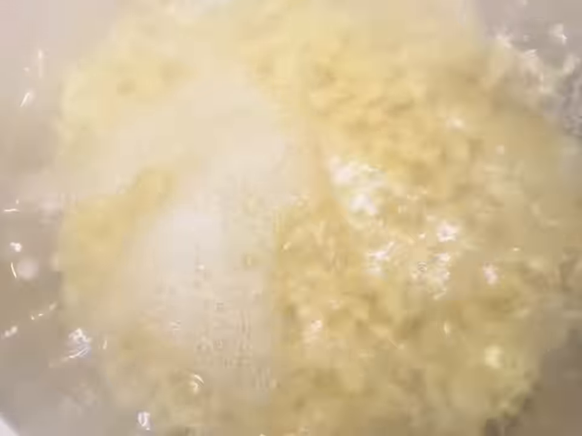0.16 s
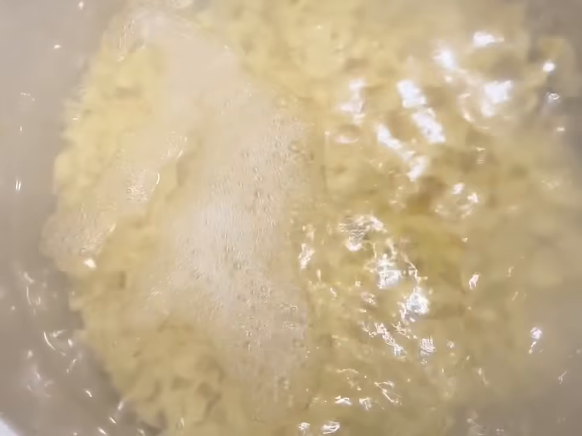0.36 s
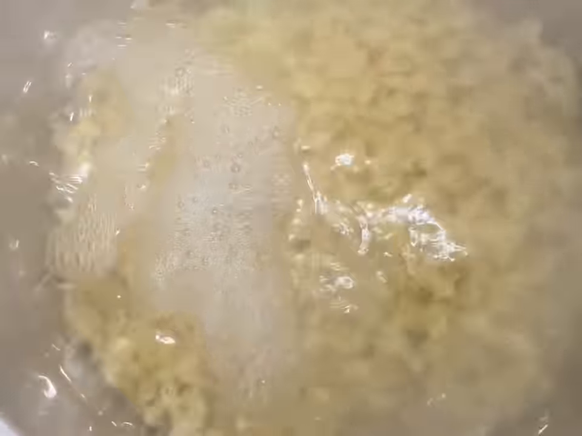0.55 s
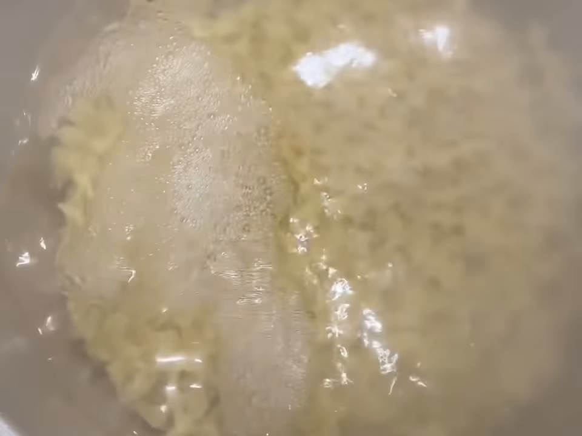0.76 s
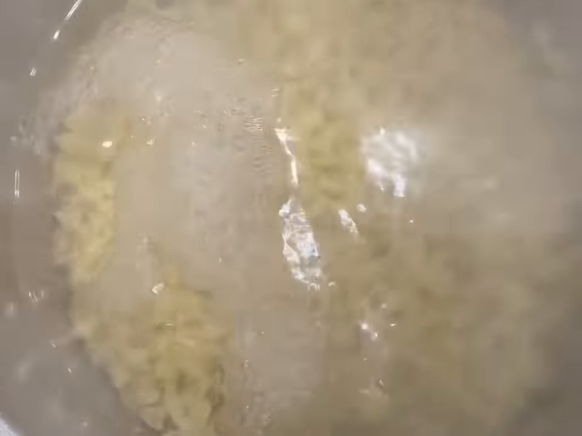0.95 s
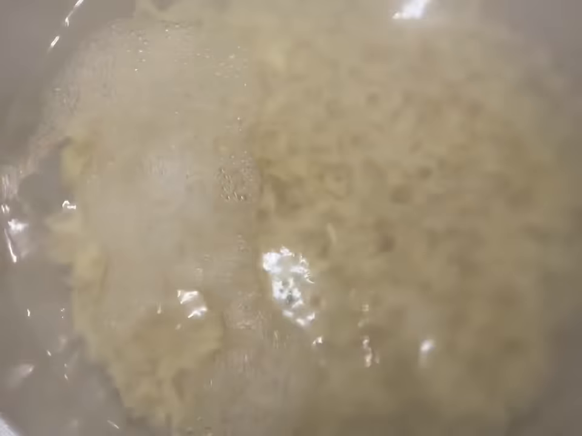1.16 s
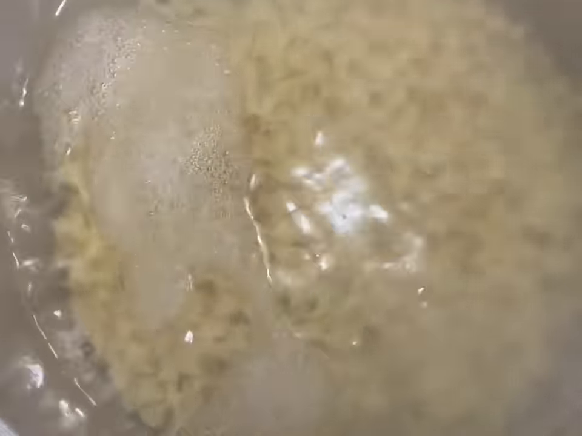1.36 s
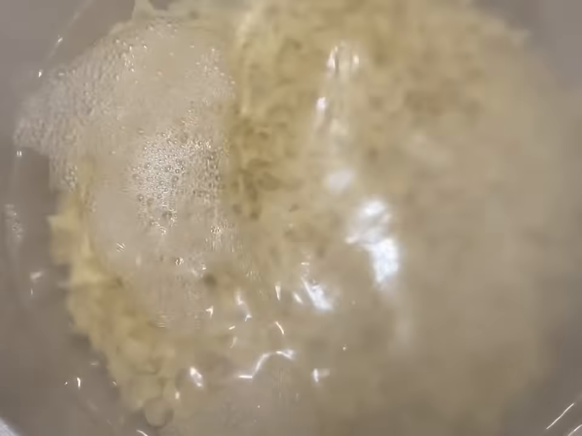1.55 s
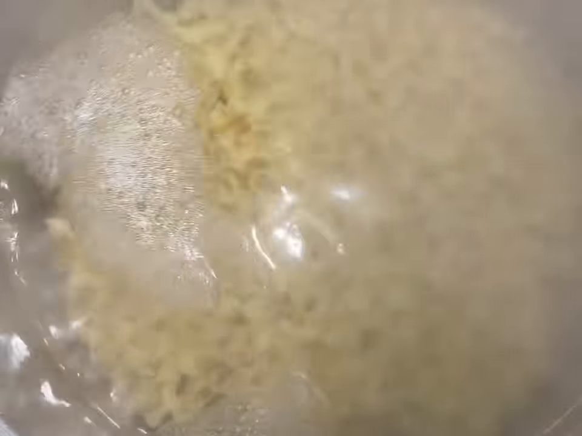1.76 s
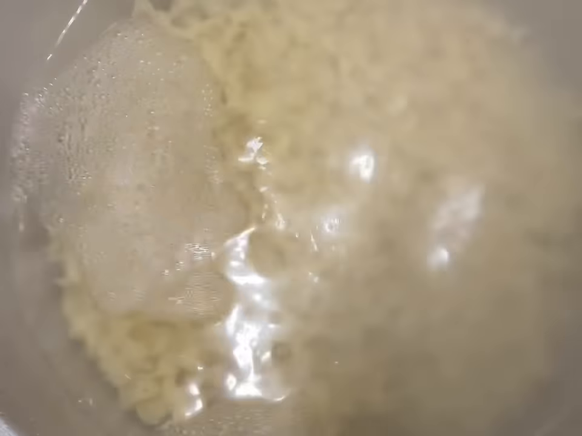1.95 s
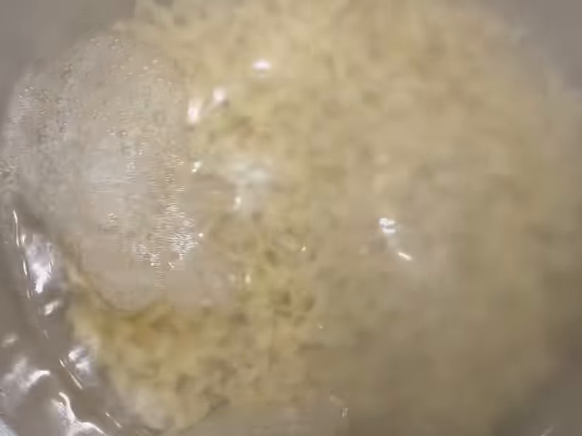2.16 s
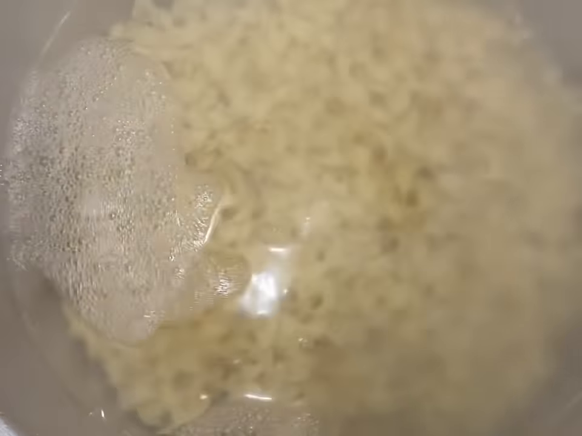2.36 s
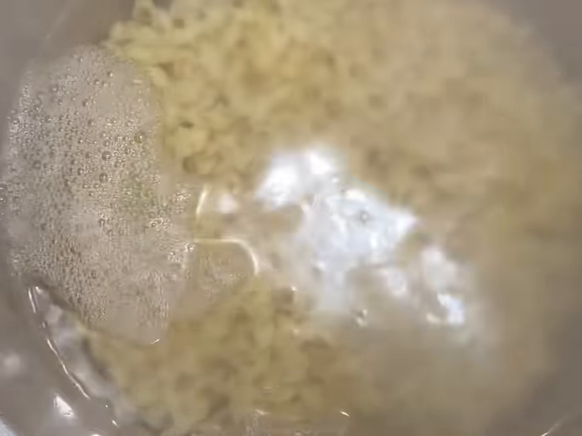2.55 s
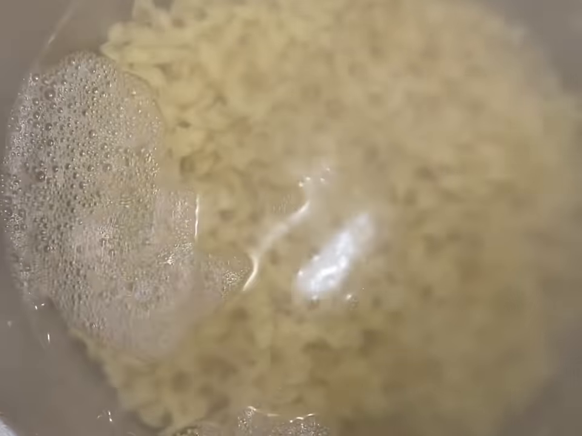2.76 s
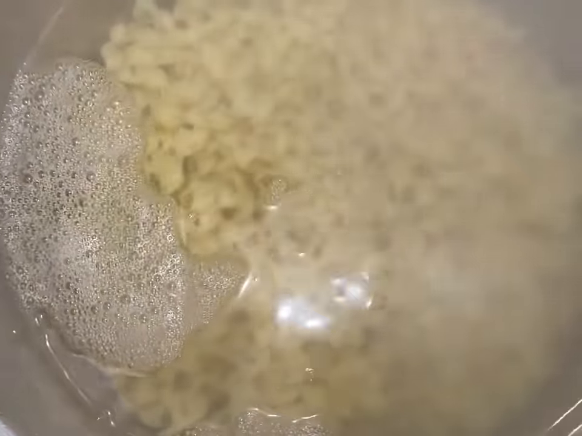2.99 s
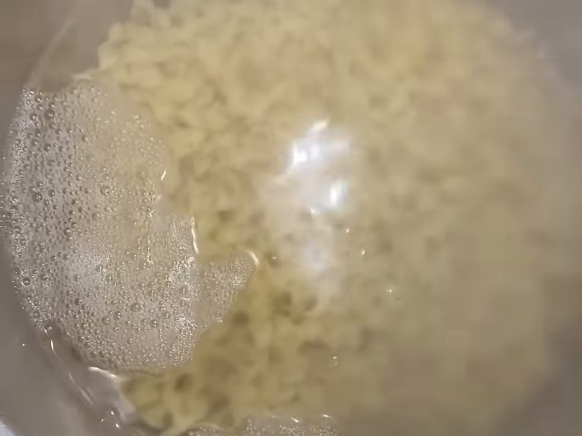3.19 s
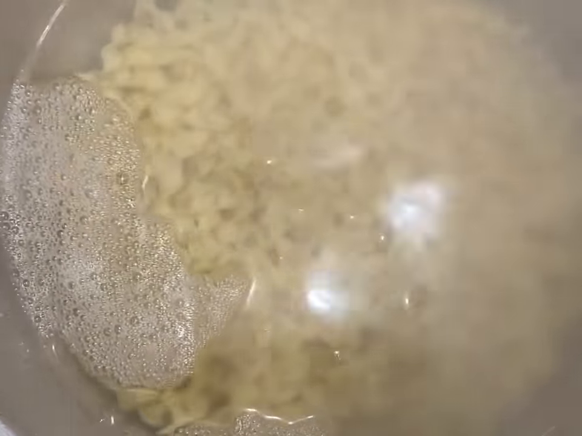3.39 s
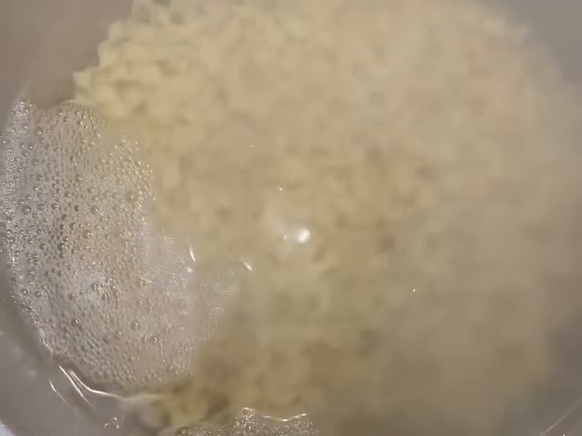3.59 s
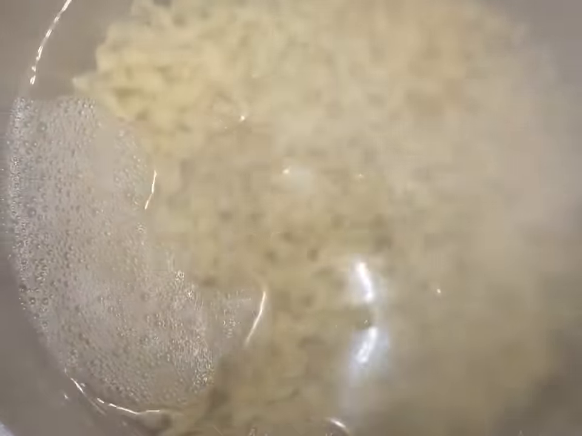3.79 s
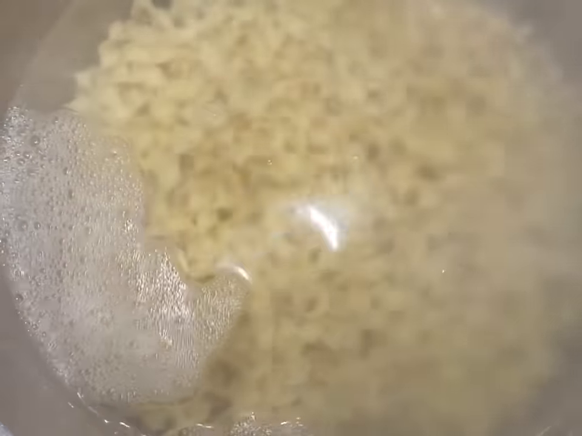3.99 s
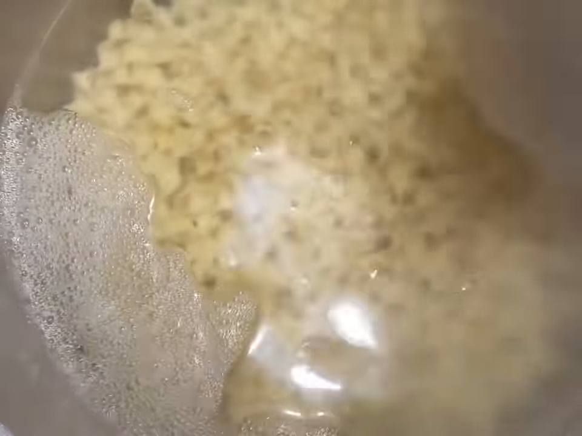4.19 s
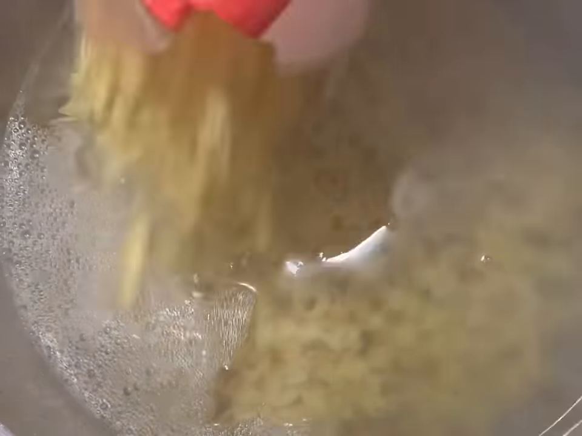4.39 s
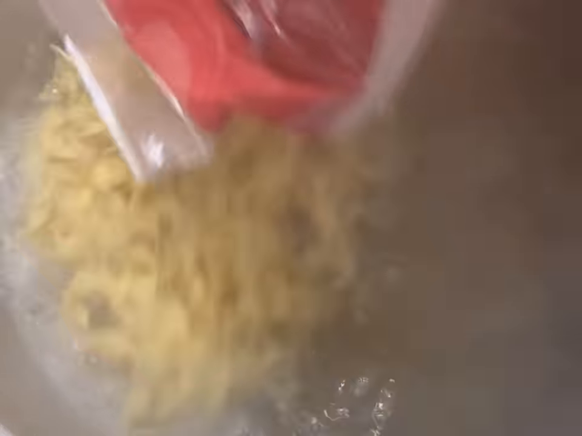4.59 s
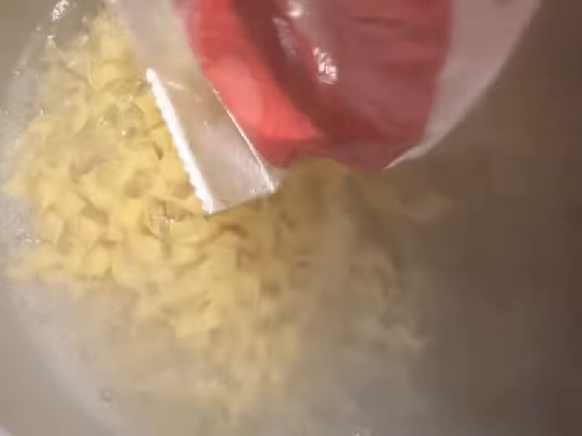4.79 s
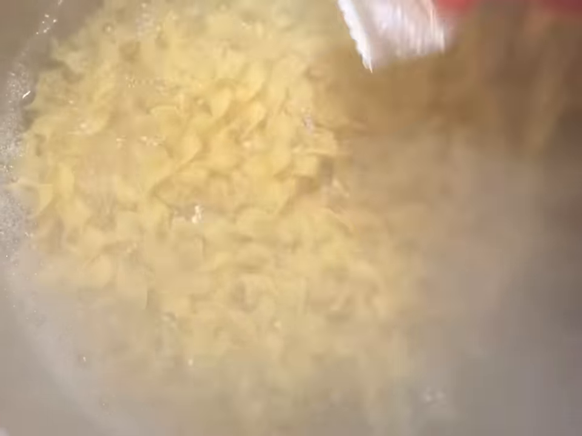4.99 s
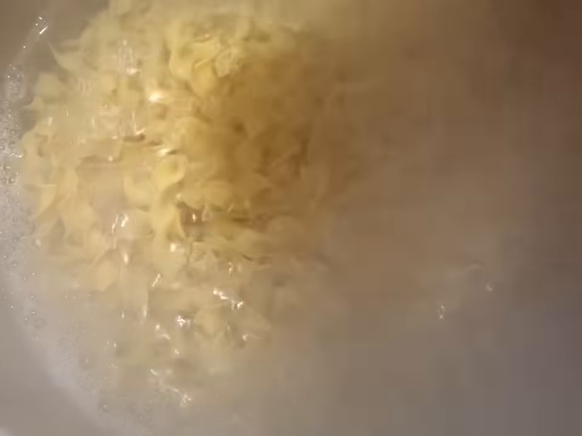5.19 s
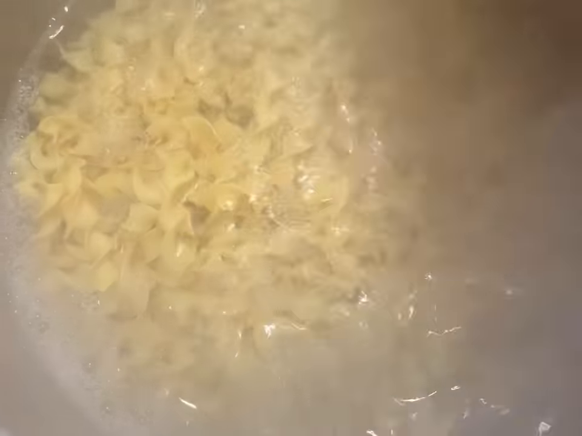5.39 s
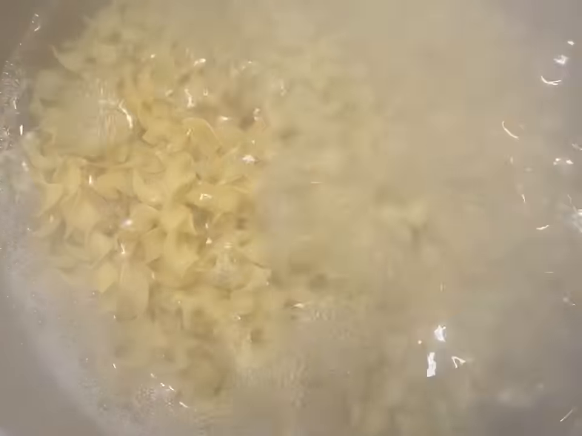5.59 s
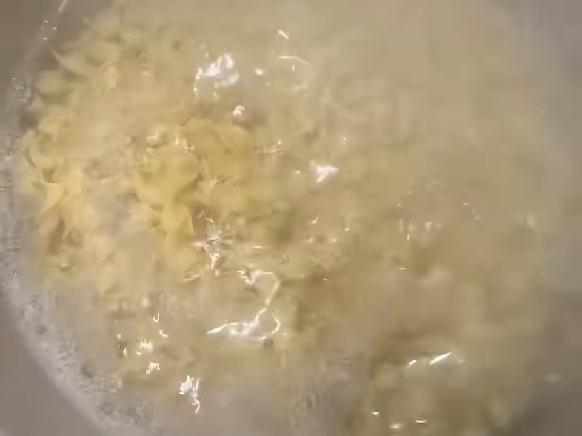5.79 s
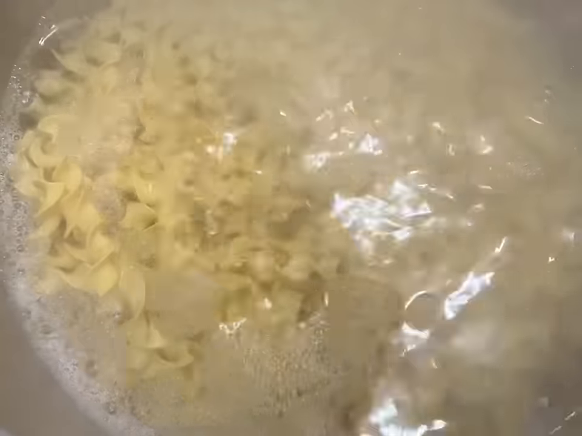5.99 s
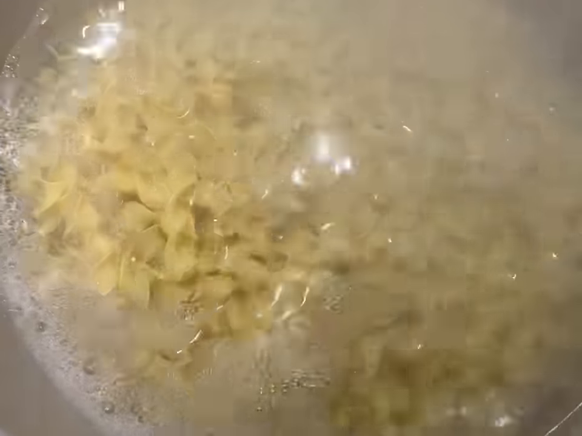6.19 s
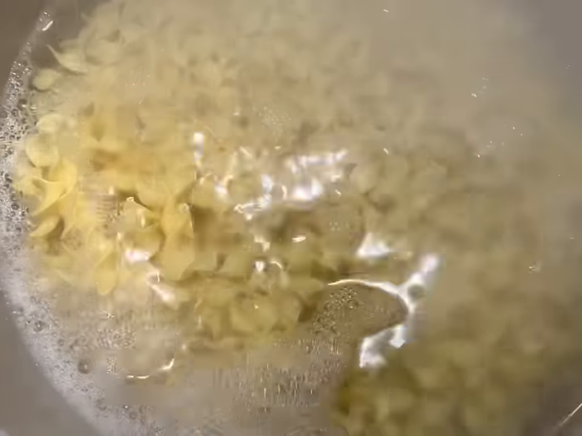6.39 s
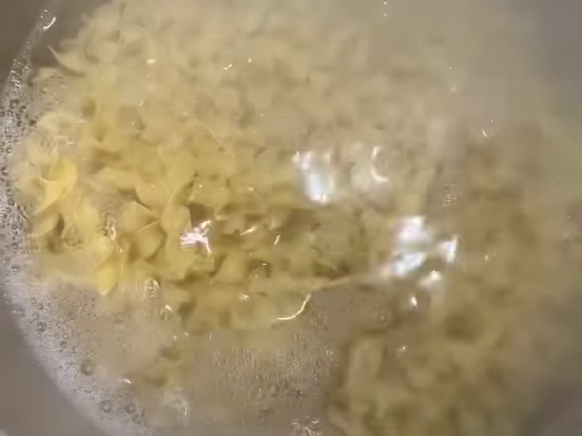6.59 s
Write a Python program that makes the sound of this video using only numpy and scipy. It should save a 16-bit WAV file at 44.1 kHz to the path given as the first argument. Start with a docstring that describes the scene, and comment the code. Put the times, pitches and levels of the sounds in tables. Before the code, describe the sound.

Close by a softly bubbling pot, film snaps and noodles shift in a bag, then rattle out and plunge into the water before lighter crinkles.

```python
"""Dry noodles into a simmering pot

At a kitchen stove, close to a stereo camera, bubbles tick and blip over a soft noise rush; three tones hum,
wavering slightly. A plastic bag of dry noodles is handled: the film snaps as short clicks and flutters of
noise, and the noodles shift in surges of random contacts. The bag is tipped: noodles rattle out as contacts and
short damped tones, its mouth flaps as a ringing tone, and clumps plunge as low pulses over a churn. The bag
crinkles on. Early, one soft bump of the camera and its after-ring sound as low tones. Pot modes and a short
kitchen tail colour the nearby sounds."""
import sys
import numpy as np
from scipy import signal
from scipy.fft import rfft, irfft, next_fast_len
from scipy.io import wavfile
from scipy.ndimage import map_coordinates

SR = 44100
rng = np.random.default_rng(int(sys.argv[2]) if len(sys.argv) > 2 else 0)


def inscribe(sig):
    """Save sig as 16-bit PCM at rate SR to the path in sys.argv[1].

    A 1-D sig is mono; a 2-D sig holds one channel per row.
    Samples are clipped to [-1, 1] before scaling.
    """
    pcm = np.round(np.clip(np.atleast_2d(sig).T, -1, 1) * 32767)
    wavfile.write(sys.argv[1], SR, pcm.astype(np.int16))


N = 293265  # length in samples


def amp(db):
    """Decibels to gain."""
    return 10 ** (np.asarray(db) / 20)


def unit(x):
    """Scaled to rms 1."""
    return x / np.sqrt(np.mean(x ** 2) + 1e-20)


def along(points, hz):
    """(Hz, value) points read on a log frequency axis."""
    f, v = np.transpose(points)
    return np.interp(np.log(hz + 1), np.log(f + 1), v)


def wobble(rate):
    """A smooth random curve, rate knots a second."""
    knots = rng.standard_normal(int(N * rate / SR) + 4)
    return map_coordinates(knots, [np.arange(N) * rate / SR])


def filtered(x, response):
    """x times a complex response of frequency."""
    m = next_fast_len(N + SR // 2)
    spectrum = rfft(x, m) * response(np.fft.rfftfreq(m, 1 / SR))
    return irfft(spectrum, m)[..., :N]


def convolved(x, response):
    """x through an impulse response of one or two channels."""
    return signal.fftconvolve(np.atleast_2d(x), response, axes=1)[:, :N]


def coloured(x, spectrum, size=2048):
    """Causal (minimum-phase) colour of unit energy, so that clicks keep their sharp front."""
    cepstrum = irfft(np.log(amp(along(spectrum, np.fft.rfftfreq(size, 1 / SR)))))
    cepstrum[1:size // 2] *= 2  # fold the cepstrum onto its causal half
    cepstrum[size // 2 + 1:] = 0
    response = irfft(np.exp(rfft(cepstrum)))
    return convolved(x, response[None] / np.linalg.norm(response))


def split(x, hz, order=3):
    """The parts below and above a frequency."""
    return [signal.sosfilt(signal.butter(order, hz, kind, fs=SR, output="sos"), x) for kind in ("low", "high")]


def tick(t60, alike, attack=.0001):
    """One dry contact: decaying noise of energy 1, shared between the two channels by the part alike."""
    t = np.arange(SR // 24) / SR
    shared, own = rng.standard_normal(len(t)), rng.standard_normal((2, len(t)))
    share = np.clip(alike, 0, 1)
    noise = np.sqrt(share) * shared + np.sqrt(1 - share) * own
    envelope = amp(-60 * t / t60) * (1 - np.exp(-t / attack))
    return unit(noise * envelope) / np.sqrt(len(t))


def scatter(rate, spread_db):
    """Random contacts, many small and few large: sample position, signed size and two normal numbers each."""
    draws = np.random.default_rng(rng.integers(N)).standard_normal((int(rate * N / SR) + 1, 5))
    when, strength, phase, detune, direction = draws.T
    size_db = spread_db * np.minimum((strength ** 2 + phase ** 2) / 2, 4)
    size = amp(size_db) * np.sign(phase)
    return (when * N * SR % N).astype(int), size, detune, direction


def crackle(rate, spread_db, t60, alike, count=32):
    """Dry contacts, rate a second, in count different shapes."""
    out = np.zeros((2, N))
    for _ in range(count):
        start, size, *_ = scatter(rate / count, spread_db)
        impulses = np.bincount(start, size, N)[None]
        out += signal.oaconvolve(impulses, tick(t60, alike), axes=1)[:, :N]
    return unit(out)


def rings(rate, pitch_hz, octaves, t60, rise=0, spread_db=4, size=900):
    """Short damped tones, each with its own direction and pitch, which may rise by a share over t60 seconds."""
    start, strength, detune, direction = scatter(rate, spread_db)
    t = np.arange(size) / SR
    hz = np.minimum(pitch_hz * 2 ** (octaves * detune), SR / 3)[:, None]
    cycles = hz * t * (1 + .5 * rise * t / t60)
    envelope = (1 - np.exp(-2 * cycles)) * amp(-60 * t / t60)
    tones = strength[:, None] * np.sin(2 * np.pi * cycles) * envelope
    where = (start[:, None] + np.arange(size)).ravel()
    parts = (tones, tones * direction[:, None])  # sum, difference
    return unit(np.array([np.bincount(where, part.ravel(), N)[:N] for part in parts]))


def thuds(rows, t60, attack, rise=0):
    """Low decaying pulses, whose pitch may rise by a share over t60 seconds."""
    out, t = np.zeros(N + SR), np.arange(SR // 4) / SR
    for s, db, hz in rows:
        cycles = hz * t * (1 + .5 * rise * t / t60)
        envelope = amp(db - 60 * t / t60) * (1 - np.exp(-t / attack))
        out[round(s * SR):][:len(t)] -= envelope * np.sin(2 * np.pi * cycles)
    return split(out[:N], hz=38, order=3)[1]


def click(hz, life):
    """A damped tone of energy 1 that falls 60 dB within life cycles."""
    cycles = hz * np.arange(SR // 24) / SR
    pulse = np.sin(2 * np.pi * cycles) * (1 - np.exp(-2 * cycles)) * amp(-60 * cycles / life)
    return pulse / np.linalg.norm(pulse)


SAG_DB_PER_S, SETTLE_DB_PER_S = 9, 97  # fall while a surge is held, and afterwards


def surges(rows):
    """Gain of overlapping surges, added in power: each rises, sags while it is held, then settles."""
    power = np.zeros(N)
    for start, rise, hold, db in rows:
        t = np.arange(N) / SR - start
        sag_db = SAG_DB_PER_S * np.clip(t - rise, 0, hold)
        settle_db = SETTLE_DB_PER_S * np.maximum(t - rise - hold, 0)
        power += (np.clip(t / rise, 0, 1) * amp(db - sag_db - settle_db)) ** 2
    return np.sqrt(power)


def aside(x, db):
    """Places a source by setting the gain of the difference of the microphones against their sum."""
    return np.array([x[0], amp(db) * x[1]])


# Ring of the pot and its air. Each row: frequency in Hz, relative starting level in dB.
POT_MODES = [(490, 2), (740, -5), (1060, -2), (1222, -3), (1454, -1), (2040, 1), (2380, -4), (2700, -6),
             (2932, -4), (3802, -5), (4054, -5), (4477, -6), (4710, -5)]
POT_T60_S = 0.13


def in_pot(x, ring_db):
    """Sound near the pot sets its modes ringing, each a decaying cosine."""
    t = np.arange(SR // 6) / SR
    modes = sum(amp(db - 60 * t / POT_T60_S) * np.cos(2 * np.pi * hz * t) for hz, db in POT_MODES)
    return x + amp(ring_db) * convolved(x, modes[None] / np.linalg.norm(modes))


# Reverberation of the kitchen. Each row: frequency in Hz, time to fall 60 dB in seconds.
KITCHEN_T60 = [(200, 0.19), (3000, 0.2), (12000, 0.11)]


def in_kitchen(x, wet_db, size=8192):
    """Walls and worktop add a short diffuse noise tail, drawn afresh every size samples."""
    wet = np.zeros((2, N + SR))
    for start in range(0, N, size):
        hz, t, z = signal.stft(rng.standard_normal((2, SR // 4)), SR, nperseg=256)
        decay = amp(-60 * t / along(KITCHEN_T60, hz)[:, None])
        tail = signal.istft(z * decay, SR, nperseg=256)[1]
        answer = signal.fftconvolve(x[:, start:start + size], tail / np.linalg.norm(tail[0]), axes=1)
        wet[:, start + SR // 400:][:, :answer.shape[1]] += answer  # 2.5 ms later
    return x + amp(wet_db) * wet[:, :N]


# Colour of the foam and the stove's rush. Each row: frequency in Hz, relative level in dB.
SIMMER_COLOUR = [(22, -23), (50, -4.5), (110, 9.5), (190, -3), (280, 5), (420, 0), (650, -4.5),
                 (1000, -4.5), (2000, -9), (3000, -15.5), (5000, -16.5), (8000, -18), (12000, -33)]


def simmer():
    """Small bubbles burst in the foam and blip in the water, over the soft rush of the stove."""
    swell = amp(1.5 * wobble(5))
    foam = swell * crackle(rate=200, spread_db=5.0, t60=0.0037, alike=0.77)
    rush = 0.65 * rng.standard_normal(N) + 0.81 * rng.standard_normal((2, N))  # shared and separate noise
    blips = rings(rate=53, pitch_hz=597, octaves=0.71, t60=0.059, rise=0.18, spread_db=3, size=1500)
    foam_and_rush = coloured(amp(-51.5) * foam + amp(-48.0) * rush, SIMMER_COLOUR)
    water = foam_and_rush + amp(-66.5) * blips
    return in_kitchen(in_pot(water, ring_db=-25.5), wet_db=-7)


# Wavering tones of motor, mains hum and fan. Each row: frequency in Hz, rms level in dB about which it wavers.
HUM_TONES = [(58.3, -43.5), (120, -47.5), (904.4, -58)]


def hum():
    """Three sine tones of motor, mains hum and fan, each wavering slightly in level and phase."""
    t = np.arange(N) / SR
    tones = 0
    for hz, db in HUM_TONES:
        level = amp(db + 2.0 * wobble(4.01)) * np.sqrt(2)
        wavering_s = t + 0.00032 * wobble(5.6)
        tones = tones + level * np.sin(2 * np.pi * hz * wavering_s)
    return tones


# The clearest snaps of the bag's film. Each row: start in seconds, relative energy of the click in dB,
# relative energy of the flutter in dB, treble relative to both in dB.
FILM_SNAPS = [(.005, -3.5, -11, -21.5), (0.242, -19, -21, -15), (.2897, -21, -18.5, -8.5),
              (.3293, 1.5, -11, -12), (.3386, 1.5, -1.5, -15), (.419, -15, -13, -11.5),
              (0.493, -11, -8, -25), (.542, -10, -13, -23), (.568, -22, -8.5, -15), (.586, -7, -11.5, -25),
              (.622, -7, -8.5, -30), (0.6596, -13, -0.5, -17.5), (.744, -1, 0, -16), (.988, -18, -2, -18),
              (2.179, -13, -5.5, -22), (2.857, -16, -13, -6.5), (3.0464, -17, -16, -1.5),
              (3.359, 6, -4.5, -23), (3.486, -15, -2.5, -9), (3.617, -2, -11.5, -23),
              (3.7032, 0, -8.5, -22), (3.73, -24, -7, -6.5), (4.1232, -6, -4.5, -14), (4.151, -7, -6.5, -8),
              (4.171, 1.5, -4, -9.5), (4.2478, 6, -1, -10.5), (4.265, -4, 0, -16), (4.2749, 3.5, -7, -24),
              (4.2872, 2.5, -16, -3.5), (4.318, 2, 0, -10), (4.389, 0, -8, -11), (4.6768, 2, -3, -3),
              (4.8189, -14, -15, 6), (4.999, -2.5, -15, -4), (5.023, -8, -13, -5), (5.031, 0.5, -3.5, -8),
              (5.135, -13, -6.5, -22), (5.344, -14.5, -13.5, -12.5), (5.389, -10.5, -11, -18),
              (5.4744, -27, -29, -2), (5.498, -12, -10.5, -15), (5.597, -11, -12, -12),
              (5.604, -7, -8.5, -16.5), (5.629, -22, -11, -15), (5.6467, -4, -8, -12.5),
              (5.7594, -12.5, -14.5, -4), (5.9314, -10, -13.5, -8.5), (5.994, -14.5, -18, -6),
              (6.047, -13, -8.5, -24), (6.134, -12.5, -9, -11), (6.221, -14, -8, -10),
              (6.257, -6, -7.5, -11), (6.267, -15, -3, -15), (6.2888, 0, -6.5, -25),
              (6.307, -14, -4.5, -11.5), (6.37, -12, -14, -7), (6.4863, -8, -11.5, -15),
              (6.5198, -4, -6, -16.5), (6.534, -5, -18, -26), (6.583, -18, -6, -8)]
# Colour of the fluttering film. Each row: frequency in Hz, relative level in dB.
FILM_COLOUR = [(150, -2), (500, 1.5), (900, 7), (1900, 9), (3000, 5.5), (4500, 3), (7000, -4.5),
               (10000, -9)]
# Colour of its bright cracks. Each row: frequency in Hz, relative level in dB.
CRACK_COLOUR = [(1500, -11), (4000, -9), (6500, 7), (10000, 1.5), (13000, -11.5)]
CLICK_HZ, CLICK_CYCLES = 4050, 3.7  # pitch at 0 dB of treble or more; life
CLICK_DB_PER_OCTAVE = 16  # snaps with less treble click lower
SHEET_HZ, SHEET_CYCLES = 1752, 21  # typical pitch and life of the patches of film that a snap sets ringing


def snaps():
    """Creases of the film buckle in a short burst with a bright crack; patches ring and the sheet flutters."""
    clicks, sheet, cracks = np.zeros((3, 2, N + SR))
    for s, click_db, flutter_db, treble_db in FILM_SNAPS:
        buckle = tick(t60=0.0078, alike=0.74, attack=0.00017)
        size = buckle.shape[1]
        span = slice(round(s * SR), round(s * SR) + size)
        hz = CLICK_HZ * 2 ** (min(treble_db, 0) / CLICK_DB_PER_OCTAVE)
        burst = convolved(buckle, click(hz, CLICK_CYCLES)[None])[:, :size]
        clicks[:, span] += amp(click_db) * unit(burst) / np.sqrt(size)
        for patch_hz in SHEET_HZ * 2 ** (0.393 * rng.standard_normal(size=3)):
            clicks[:, span] += amp(flutter_db - 8) * rng.choice([-1, 1]) * click(patch_hz, SHEET_CYCLES)
        sheet[:, span] += amp(flutter_db) * tick(t60=0.059, alike=0.62, attack=0.00097)
        sharp = amp(click_db) * tick(t60=0.002, alike=1)
        ragged = amp(flutter_db) * tick(t60=0.024, alike=0.59, attack=0.0013)
        cracks[:, span] += amp(treble_db) * (sharp + ragged)
    flutter = amp(0.87) * coloured(sheet, FILM_COLOUR)
    bright = amp(9.5) * coloured(cracks, CRACK_COLOUR)
    return in_kitchen(amp(-2.5) * clicks[:, :N] + flutter + bright, wet_db=-6.0)


# Stretches in which the film keeps crinkling faintly. Each row: start in seconds, rise in seconds,
# hold in seconds, level in dB before the kitchen's tail.
CRINKLE_STRETCHES = [(.26, 0.04, 0.077, -42), (5.4, 0.27, 0.13, -46.5), (5.94, 0.026, .02, -44.5)]


def crinkle():
    """Small creases give way at random among the snaps, as coloured dry contacts."""
    creases = crackle(rate=130, spread_db=2.5, t60=0.012, alike=.7)
    film = unit(coloured(creases, FILM_COLOUR) + amp(-18) * coloured(creases, CRACK_COLOUR))
    return in_kitchen(surges(CRINKLE_STRETCHES) * film, wet_db=-1.5)


# Shoves that make the noodles shift in the bag. Each row: start in seconds, rise in seconds,
# hold in seconds, relative level in dB.
BAG_SHOVES = [(.535, 0.012, 0.19, -38), (.661, 0.0024, 0.0071, -33.5), (.712, 0.017, 0.009, -30.5),
              (.79, 0.0044, 0.017, -33), (.865, 0.028, 0.037, -30), (1.03, 0.014, 0.049, -36),
              (1.312, 0.03, 0.1, -36), (1.56, 0.015, 0.013, -35.5), (1.779, 0.026, 0.047, -29),
              (1.87, .02, 0.15, -34), (2.1, 0.017, 0.35, -38), (2.4, 0.066, 0.03, -26),
              (2.495, 0.0085, 0.019, -26.5), (2.64, 0.076, 0.08, -27), (2.86, 0.022, 0.15, -28.5),
              (3.09, 0.041, 0.17, -29), (3.345, 0.016, 0.015, -25), (3.43, 0.053, 0.024, -31),
              (3.59, 0.0025, 0.031, -31.5), (3.7, 0.0067, 0.12, -36), (3.83, 0.02, 0.045, -34.5),
              (6.04, 0.13, 0.017, -32), (6.21, 0.022, 0.059, -31.5), (6.48, 0.028, 0.28, -37)]
# Colour of noodles rubbing each other and the film. Each row: frequency in Hz, relative level in dB.
RUSTLE_COLOUR = [(90, -16), (200, -6), (380, 1), (700, -2.5), (1050, 0), (1350, -3), (1900, 3.5),
                 (2800, -2.5), (4200, -8), (6000, -8), (8000, -16.5), (10000, -12.5), (12000, -21)]
FIRM_DB, CRISP_DB, CRISP_GROWS = -30, 2, 1.18  # treble gain of a shove at FIRM_DB; harder shoves are brighter
BAG_SHIFT = 1.03  # resonances slide down or up by this ratio as the bag is let go or squeezed


def handling():
    """Noodles rub each other and the film as the bag is moved; each surge comes in small jerks."""
    body = surges(BAG_SHOVES)
    crisp = amp(FIRM_DB + CRISP_DB) * (body / amp(FIRM_DB)) ** CRISP_GROWS

    def rubbing(shift):
        """Dense dry contacts, their colour slid in frequency by the ratio shift."""
        contacts = crackle(rate=1200, spread_db=1.5, t60=0.011, alike=0.5)
        return unit(coloured(contacts, [(hz * shift, db) for hz, db in RUSTLE_COLOUR]))

    slack, tight = rubbing(1 / BAG_SHIFT), rubbing(BAG_SHIFT)
    squeeze = np.pi / 4 * (1 + np.tanh(wobble(7)))  # crossfade angle
    rubs = np.cos(squeeze) * slack + np.sin(squeeze) * tight
    clinks = rings(rate=240, pitch_hz=1452, octaves=.48, t60=0.034, spread_db=2.6)  # each noodle has its own pitch
    jerks = amp(.9 * wobble(45))
    low, high = split((rubs + amp(-4.0) * clinks) * jerks, hz=2750)
    rustle = amp(-4.5) * body * low + crisp * high
    return aside(in_kitchen(in_pot(rustle, ring_db=-26), wet_db=-8.5), db=0.5)


# One dull bump of the camera and its low after-ring. Each row: start in seconds, relative level in dB, pitch in Hz.
CAMERA_BUMP = [(0.931, -7, 61.5), (0.98, -17.5, 88), (1.04, -26, 66)]


def bump():
    """A soft bump of the camera body and its after-ring, low pulses that die within a few cycles."""
    return thuds(CAMERA_BUMP, t60=0.061, attack=0.0046)


# A burst of larger bubbles in the boiling water. Each row: start in seconds, rise in seconds,
# hold in seconds, level in dB.
BUBBLE_BURSTS = [(3.345, 0.013, 0.057, -36)]


def boil():
    """A cluster of large bubbles wells up and plops, as damped tones of rising pitch."""
    plops = rings(rate=350, pitch_hz=455, octaves=0.35, t60=0.033, rise=0.36, spread_db=4.5, size=1800)
    return surges(BUBBLE_BURSTS) * plops


# The stream leaving the bag. Each row: time in seconds, relative level of the rattle in dB,
# relative level of the sliding hiss in dB.
POUR_FLOW = [(4.07, -42.5, -49.5), (4.106, -35, -38), (4.206, -29, -34), (4.252, -27.5, -29),
             (4.33, -17.5, -21), (4.41, -17.5, -19), (4.51, -20, -18), (4.59, -24, -23), (4.76, -26.5, -22),
             (4.832, -26, -27), (4.912, -26, -17), (5.03, -38.5, -31), (5.07, -55, -64)]
FLOW_FADE_DB_PER_S = 250  # the first and last stragglers


def flow():
    """Gains of the rattle and the hiss, fading in before and away after the pour."""
    s, *columns = np.transpose(POUR_FLOW)
    t = np.arange(N) / SR
    outside = np.abs(t - np.clip(t, s[0], s[-1]))  # seconds from the pour
    return [amp(np.interp(t, s, db) - FLOW_FADE_DB_PER_S * outside) for db in columns]


# Colour of noodles striking the film and the heap. Each row: frequency in Hz, relative level in dB.
RATTLE_COLOUR = [(100, -5.5), (250, 0.5), (500, 3.5), (750, -4), (1050, 0), (2000, 2), (2800, -4.5),
                 (3800, -5), (6000, -3.5), (8000, -4.5), (10000, -7), (12500, -11.5)]


def pour():
    """Noodles slide over the film and rattle onto the heap in the pot; single pieces tick out of the stream."""
    rattle, hiss = flow()
    contacts = unit(coloured(crackle(rate=1700, spread_db=1.0, t60=0.006, alike=0.68), RATTLE_COLOUR))
    clinks = rings(rate=300, pitch_hz=1400, octaves=.75, t60=0.03, spread_db=2.5)
    pieces = rings(rate=130, pitch_hz=3200, octaves=.6, t60=0.004, spread_db=2, size=300)
    noodles = contacts + amp(-4.5) * clinks + amp(-10.5) * pieces
    low, high = split(noodles * amp(0.83 * wobble(60)), hz=2850)  # uneven flow
    stream = rattle * low + amp(4.5) * hiss * high
    return aside(in_kitchen(in_pot(stream, ring_db=-23.0), wet_db=-10), db=-3.0)


# Noodles sink in two loads, the first few and then the bulk. Each row: start in seconds,
# rise in seconds, hold in seconds, relative level in dB.
SINKING_LOADS = [(4.22, 0.14, 0.34, -33.5), (4.6, 0.029, 0.21, -30.5)]
# Gulps of air dragged under. Each row: start in seconds, relative level in dB, starting pitch in Hz.
AIR_GULPS = [(4.258, -24, 145), (4.535, -18.5, 155), (4.63, -16.5, 75), (4.69, -18.5, 126),
             (4.755, -10.5, 101), (4.848, -17, 171), (4.885, -15.5, 90)]


def plunge():
    """Clumps of noodles drag air under the water: separate low gulps over a churning rumble."""
    churn = rings(rate=180, pitch_hz=111.6, octaves=0.566, t60=0.072, rise=0.091, spread_db=0.5, size=3500)
    gulps = thuds(AIR_GULPS, t60=0.083, attack=0.014, rise=0.083)
    return amp(-1) * surges(SINKING_LOADS) * churn + amp(3) * gulps


# The mouth of the bag flaps as noodles push past it. Each entry: time in seconds.
MOUTH_FLAPS = [4.404, 4.426, 4.474, 4.872, 4.922, 4.947, 4.962, 4.971, 4.984]
FLAP_HZ, FLAP_CYCLES, FLAP_DB = 2060, 52, -0.5  # pitch, life and energy


def flaps():
    """Each flap briefly rings the hollow of the bag as one damped tone."""
    blows = np.bincount(np.round(np.array(MOUTH_FLAPS) * SR).astype(int), minlength=N)
    return amp(FLAP_DB) * convolved(blows, click(FLAP_HZ, FLAP_CYCLES)[None])


def scene():
    """All sources in two channels: the sum and the difference of the microphones."""
    stove = simmer() + hum() + boil()
    bag = snaps() + crinkle() + handling()
    tipping = pour() + plunge() + flaps()
    return stove + bag + tipping + bump()


# The microphone pair turns treble from its sum into its difference signal.
# Each row: frequency in Hz, angle in radians.
MICROPHONE_ANGLES = [(60, 0.0028), (180, 0.031), (380, 0.13), (700, 0.28), (1250, 0.78), (2000, 0.28),
                     (2900, 0.82), (3800, 0.46), (5000, 0.74), (6200, 0.92), (6800, 1.23), (7100, 1.45),
                     (8300, 1.6), (8800, 1.985), (10950, 2.7), (12400, 3.3), (13500, 3.73), (14400, 4.71)]
TOP_HZ = 15900


def record(dry):
    """The camera forms stereo from a sum and a difference signal with opposite notches, clips and cuts the top."""
    mid = filtered(dry[0], lambda hz: np.cos(along(MICROPHONE_ANGLES, hz)))
    side = filtered(dry[1], lambda hz: -1j * np.sin(along(MICROPHONE_ANGLES, hz)))
    stereo = np.clip([mid + side, mid - side], -1, 1)
    return filtered(stereo, lambda hz: hz < TOP_HZ)


dry = scene()
out = record(dry)
inscribe(out)
```